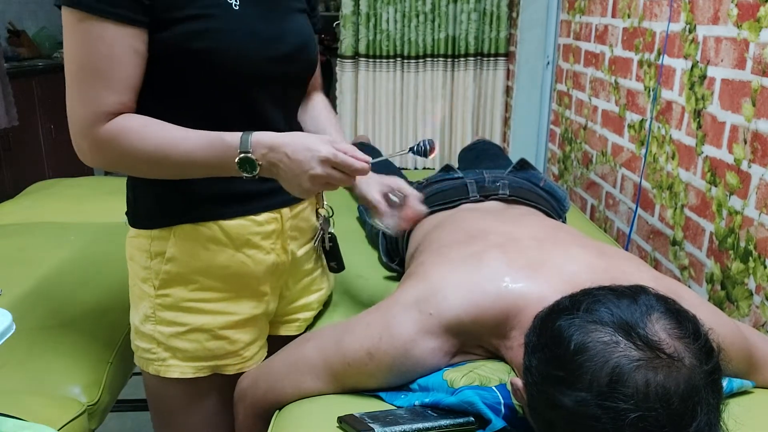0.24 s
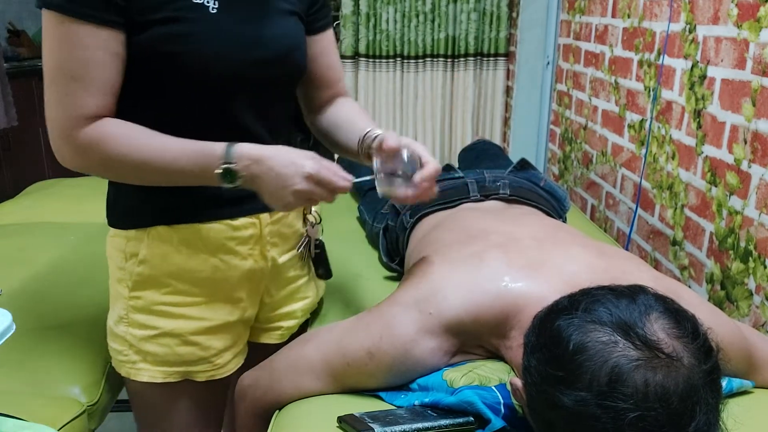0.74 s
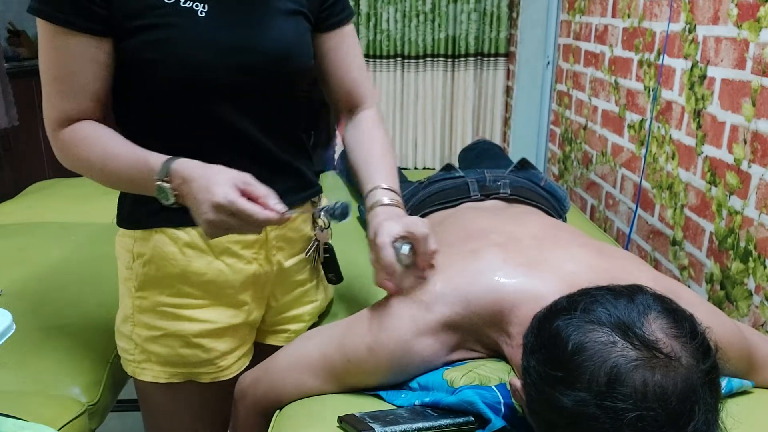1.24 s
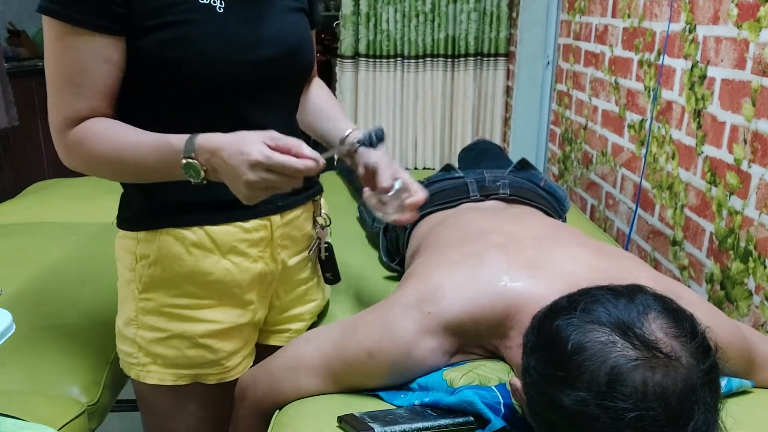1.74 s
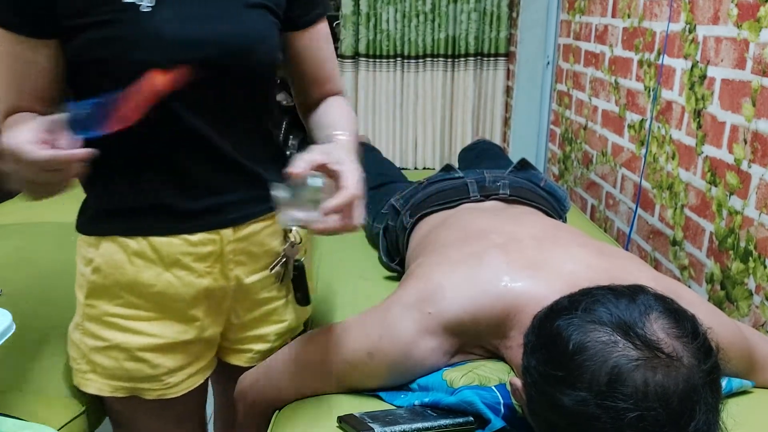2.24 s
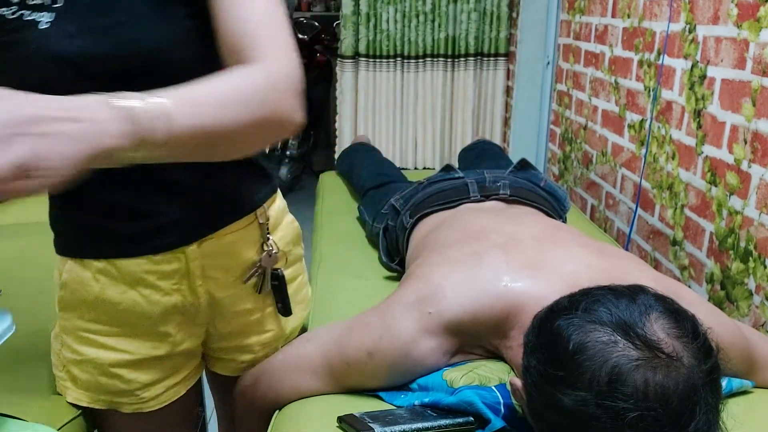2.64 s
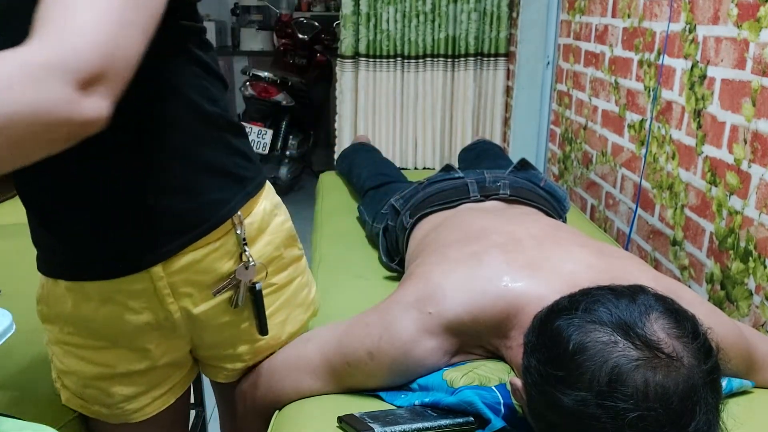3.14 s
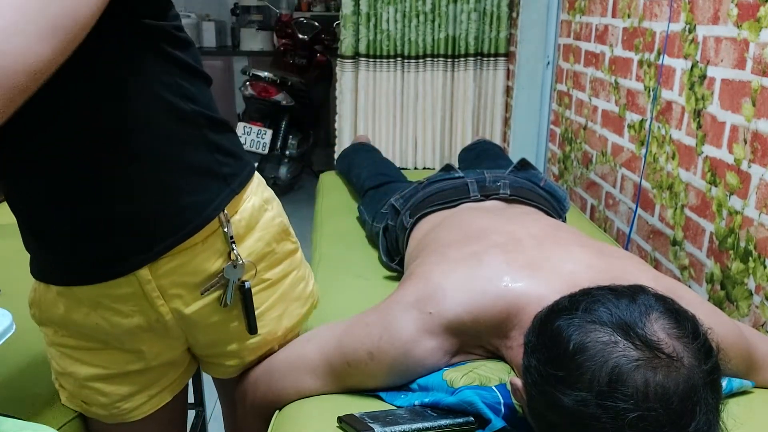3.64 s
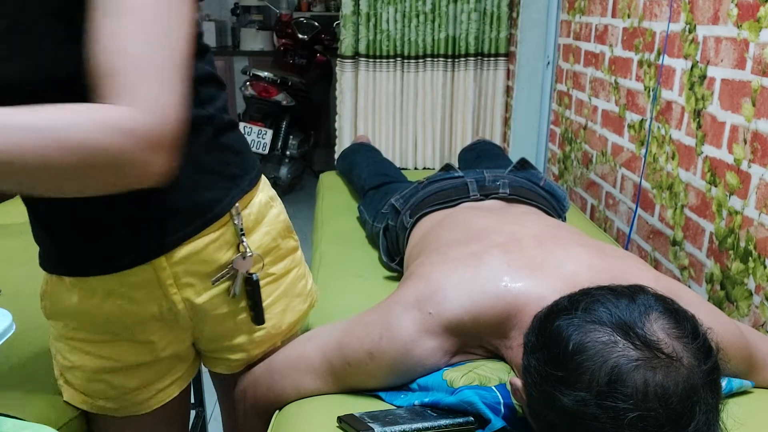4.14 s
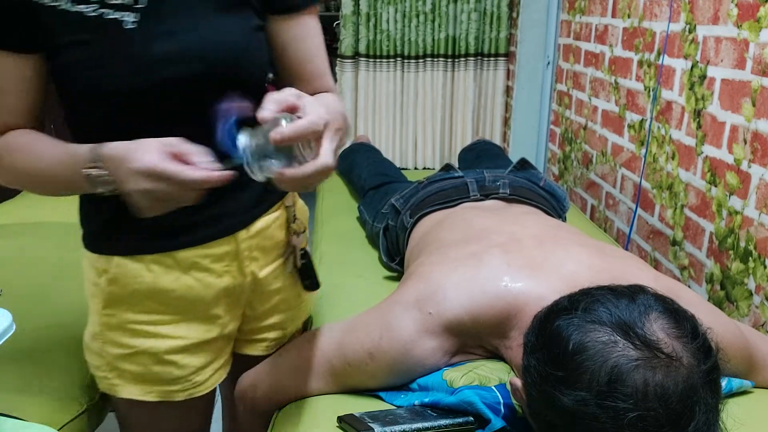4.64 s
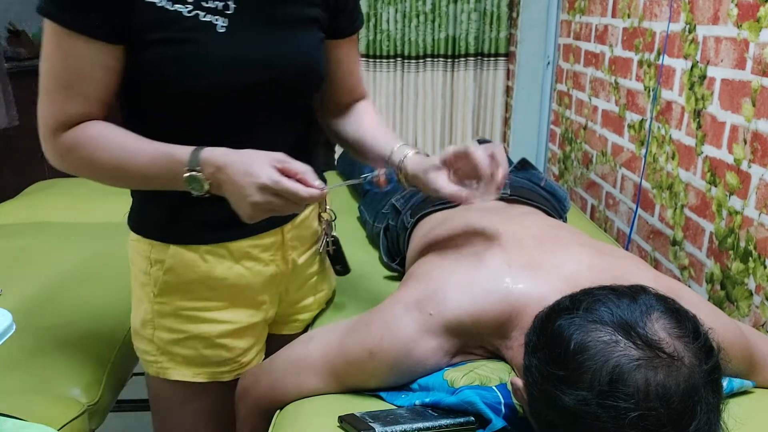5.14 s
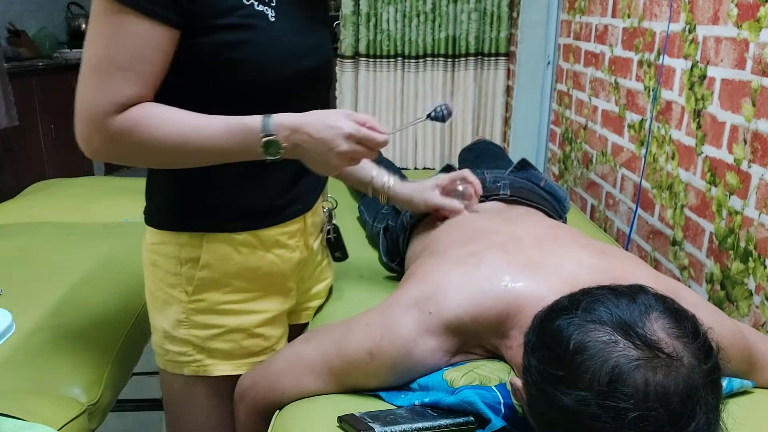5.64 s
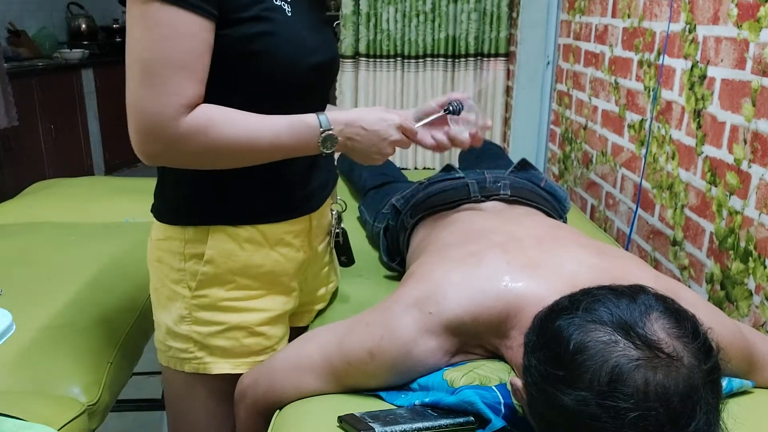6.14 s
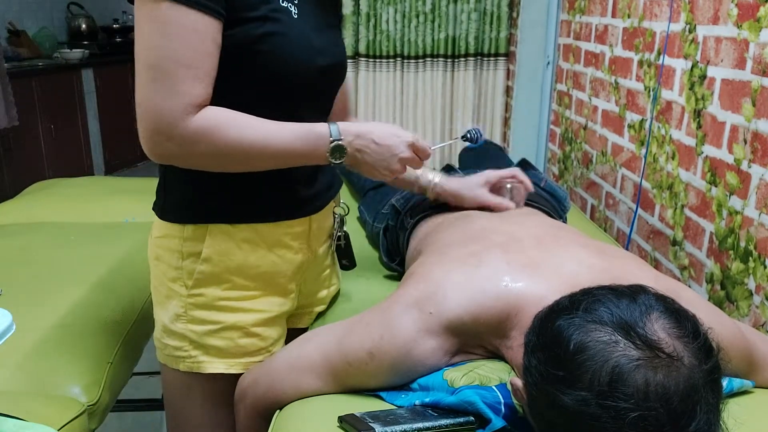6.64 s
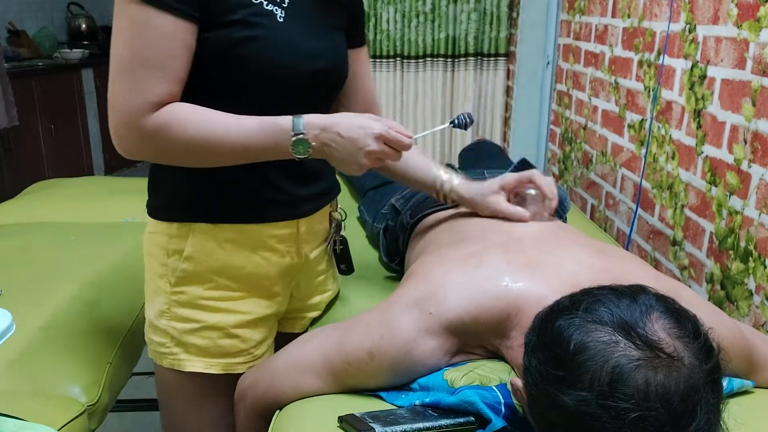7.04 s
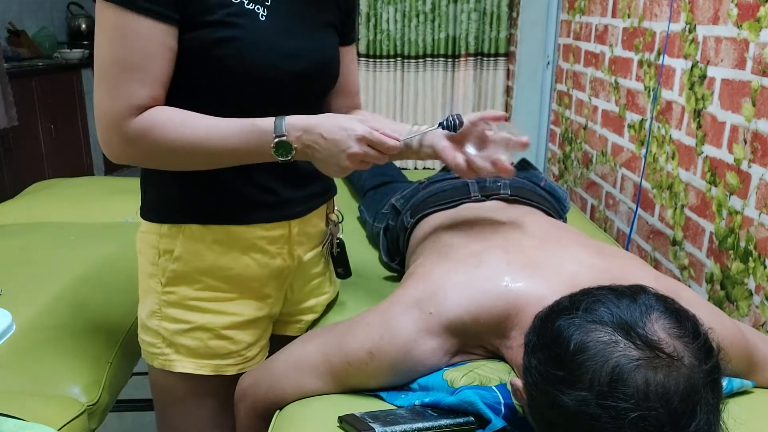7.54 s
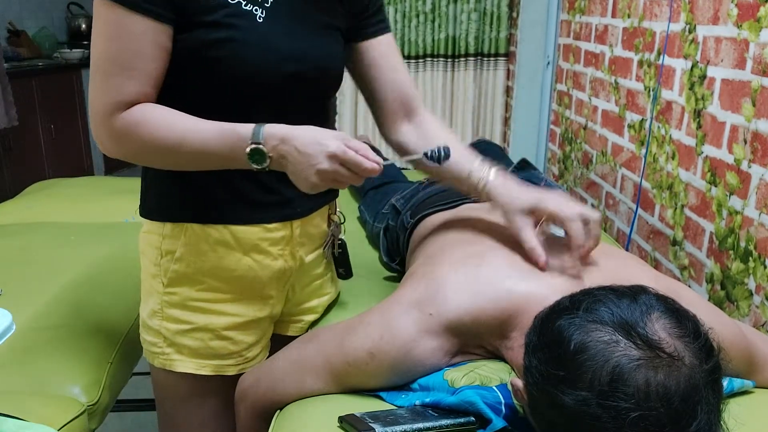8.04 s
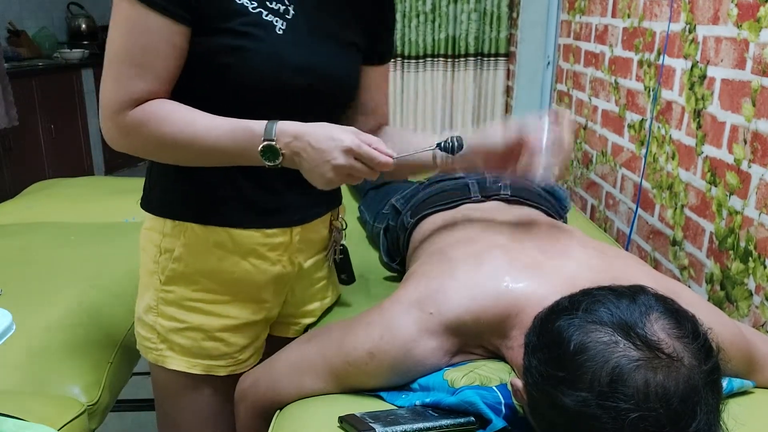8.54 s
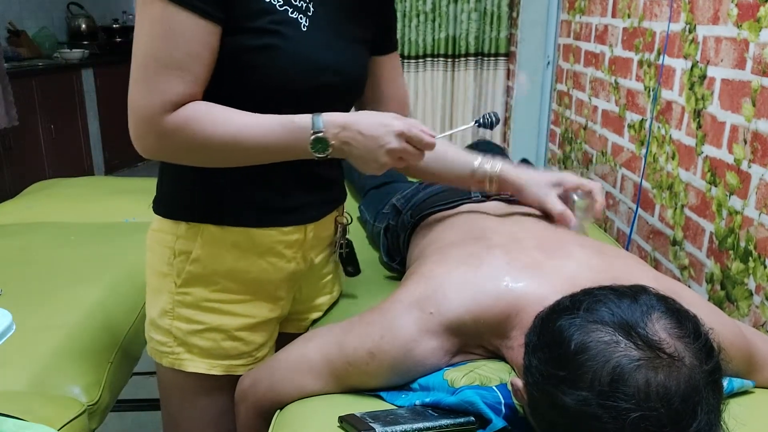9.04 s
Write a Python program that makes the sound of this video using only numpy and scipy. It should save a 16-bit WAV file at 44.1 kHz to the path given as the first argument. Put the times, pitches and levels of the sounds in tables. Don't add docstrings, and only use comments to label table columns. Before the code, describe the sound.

Glass cups smack onto an oiled back and pop off in quick trains, while spare cups clatter in a metal tray, in a small hard room.

```python
import sys
import numpy as np
from scipy import signal
from scipy.fft import rfft, irfft
from scipy.io import wavfile
from scipy.ndimage import uniform_filter1d, map_coordinates

SR = 44100
rng = np.random.default_rng(int(sys.argv[2]) if len(sys.argv) > 2 else 0)


def pcm_store(signal):
    levels = np.round(np.clip(np.atleast_2d(signal), -1, 1) * 32767)
    wavfile.write(sys.argv[1], SR, levels.astype(np.int16).T)


def nominal_scale(level):
    x = np.asarray(level, float) / 20
    return 10 ** x


N = 409248

# pitch in Hz, level in dB per Hz.
CRACK_COLOUR = [(400, -26.5), (900, -6), (1800, -13.5), (3100, -25), (5500, -27.5), (8000, -31.5),
                (12000, -30), (15800, -32), (17000, -52.5)]
# time in seconds, rim peak in dB, tray in dB, cup wall in dB, top notes in dB.
CUP_DROPS = [(2.9329, -19.5, -18.5, -47, -36.5), (2.947, -31, -22, -41.5, -46),
             (2.9839, -17.5, -14, -28.5, -37), (2.994, -21, -21.5, -30, -38),
             (3.0041, -21.5, -18, -19, -50), (3.014, -23, -21.5, -34, -49.5),
             (3.0679, -16, -16, -42.5, -44.5), (3.075, -10.5, -25.5, -38.5, -46),
             (3.085, -25, -23.5, -37.5, -49.5), (3.0944, -22, -21, -36, -44.5),
             (3.106, -25.5, -20, -39, -47), (3.1562, -27.5, -19.5, -35, -50.5),
             (3.165, -25.5, -25, -22, -46.5), (3.1737, -18.5, -21.5, -35.5, -43.5),
             (3.183, -16, -30, -34, -50.5), (3.2897, -50.5, -33.5, -51, -54.5),
             (3.3207, -54, -36, -56, -60), (3.3658, -53, -41.5, -57, -70), (3.3954, -34, -16, -40, -21),
             (3.407, -27.5, -23, -45.5, -34), (3.4193, -21, -25, -39, -33.5),
             (3.431, -21.5, -24, -38, -32.5), (3.445, -23.5, -21, -20, -31.5), (3.455, -18, -16, -17, -36),
             (3.4677, -17, -21, -29, -32), (3.479, -24, -20.5, -35.5, -36),
             (3.492, -33.5, -27.5, -42.5, -38.5), (3.509, -23, -28, -16.5, -32.5),
             (3.516, -22, -22.5, -9, -33.5), (3.5249, -23.5, -19, -6.5, -29.5), (3.532, -16, -28, -16, -33),
             (3.5441, -17, -20.5, -25, -40), (3.554, -28, -25.5, -22.5, -44.5),
             (3.5648, -29.5, -26, -31.5, -44.5), (3.577, -25, -26, -46, -49.5),
             (3.5941, -14, -31, -39, -58), (3.6377, -46, -29, -41, -65), (3.7767, -36.5, -34, -41, -52),
             (3.8473, -42, -43, -49, -51), (3.9433, -66, -50.5, -68, -70)]
# pitch in Hz, level in dB, time to fall 60 dB in seconds.
TRAY_MODES = [(970, -2, 0.029), (1150, -8.5, 0.048), (1400, -2.5, 0.0052), (1546, -3, .012),
              (1829, 1, 0.0082), (2090, -1, 0.011), (2332, -4, .006), (2550, 0, 0.0044), (2930, -4.5, .004),
              (3500, -5, 0.0093), (3620, -10.5, 0.0079)]
BOWL_MODES = [(4080, 2, 0.045), (4530, -14, 0.03)]
TOP_MODES = [(10600, -16, .02), (12376, -2, .1), (12746, 1, .1), (13170, -2, .09), (13500, -12, .07),
             (13810, -13, .06), (14050, -10, .06)]
FLOOR_MODES = [(570, -2.5, .045), (684, -15.5, 0.026), (769, -7, 0.082), (885, -10, 0.0094)]


def on_log(table, hz):
    f, v = np.transpose(table)
    return np.interp(np.log(np.maximum(hz, 1)), np.log(f), v)


def unit(x):
    return x / np.sqrt(np.mean(x ** 2))


def coloured(table, count):
    hz = np.fft.rfftfreq(count, 1 / SR)
    white = rfft(rng.standard_normal(count))
    return unit(irfft(white * nominal_scale(on_log(table, hz)), count))


def ring(x, modes):
    out = 0
    for hz, db, t60 in modes:
        r = np.exp(-np.log(1000) / (t60 * SR))
        w = 2 * np.pi * hz / SR
        out = out + signal.lfilter([0, nominal_scale(db) * r * np.sin(w)], [1, -2 * r * np.cos(w), r * r], x)
    return out


def add(bus, s, sound, pan_db, lag):
    for side, sign in enumerate((1, -1)):
        i = int(s * SR) + max(int(sign * lag), 0)
        part = np.broadcast_to(sound, (2, np.shape(sound)[-1]))[side, :N - i]
        bus[side, i:i + len(part)] += part * nominal_scale(sign * pan_db / 2)


def walk(rate, count):
    steps = np.arange(count) * rate / SR
    return map_coordinates(rng.standard_normal(int(steps[-1]) + 2), [steps], order=1) * 1.48


def slaps():
    # time in seconds, thump in dB, trapped-air pitch in Hz, trapped air in dB, bed in dB.
    hits = [(1.032, -33.5, 510, -22, -45), (5.024, -17.5, 830, -6, -61), (5.248, -18.5, 750, -10.5, -21.5),
            (5.46, -20.5, 566, -13, -26), (5.664, -20.5, 410, -9, -55), (5.877, -17.5, 480, -6, -53),
            (6.6691, -18.5, 502, -2.5, -19), (6.896, -18.5, 396, -7.5, -64), (7.104, -17, 790, -1.5, -17),
            (7.318, -18, 860, -7.5, -15.5), (8.052, -19.5, 509, -6.5, -27), (8.863, -24.5, 716, -17, -32),
            (9.094, -23, 733, -17, -25)]
    # seal closes in seconds after first contact, far side lands in seconds later, its share of the blow.
    landings = [(.0021, 0.0065, 0.19), (0.0012, .0025, 0.53), (.0016, .0014, 1.2), (0.0019, 0.0053, .3),
                (0.0013, .0056, 0.41), (.0018, .0057, 0.3), (.0004, .005, 0.24), (0.0011, 0.0056, 0.28),
                (0.0014, 0.00141, 0.34), (0.0023, 0.00121, 0.66), (.0021, 0.00173, 0.34),
                (.0016, 0.00138, 0.51), (0.0011, 0.00133, 1.12)]
    # pitch in Hz, level in dB, time to fall 60 dB in seconds.
    flesh = [(155, -23, 0.13), (185.5, 0, 0.047), (234, 6, 0.018), (296, 3, 0.04), (493, -9.5, 0.02)]
    bed = [(63.8, -5, 0.32), (91, -30, .2)]
    chamber = (1245, -10, 0.013)
    crack_db, crack_growth, firm_db = -11.5, 1.76, -20.5
    squeeze_s, squeeze = .0008, 0.51
    bus, t = np.zeros((2, N)), np.arange(int(.4 * SR)) / SR
    soft = np.hanning(int(0.00045 * SR))
    for (s, thump_db, air_hz, air_db, bed_db), (seal_s, far_s, share) in zip(hits, landings):
        touch = np.zeros(len(t))
        touch[[0, int(far_s * SR)]] = 1, share
        push = np.roll(touch, int(squeeze_s * SR)) - squeeze * touch
        push = np.convolve(push, soft / soft.sum())[:len(t)]
        seal = push * (t < squeeze_s + .0005)
        air = ring(push, [(air_hz, 0, .006)]) + ring(seal, [(3.0 * air_hz, -13, .003), chamber])
        body = nominal_scale(thump_db) * ring(push, flesh) + nominal_scale(bed_db) * ring(push, bed)
        spit = nominal_scale(6.5) * tear(len(t)) + nominal_scale(-12) * np.exp(-t / 0.0044) * coloured(CRACK_COLOUR, len(t))
        crack = nominal_scale(crack_db + crack_growth * (thump_db - firm_db)) * spit
        add(bus, s + seal_s - squeeze_s - .0006, nominal_scale(air_db) * air + body + crack, 0, 1)
    return bus


def tear(count):
    spread_s = 0.0006054
    hz = np.fft.rfftfreq(count, 1 / SR)
    late = spread_s * (1 + np.interp(hz, np.linspace(0, SR / 2, num=40), rng.exponential(size=40)))
    phase = 2 * np.pi * np.cumsum(late) * hz[1]
    snap = irfft(nominal_scale(on_log(CRACK_COLOUR, hz)) * np.exp(-1j * phase), count)
    return snap / np.sqrt(np.sum(snap ** 2))


def pops():
    # time in seconds, peak in dB, start pitch in Hz, length in seconds, skin in dB.
    pulls = [
        (0.22, -22, 266, 0.027, -10.5),
        (1.4957, -9.5, 490, 0.025, -2),
        (5.105, -10.5, 380, 0.014, -12),
        (5.306, -22.5, 380, 0.015, -26),
        (5.52, -24, 354, 0.019, -20),
        (5.936, -27, 223, 0.025, -15),
        (7.393, -18, 332, 0.021, -12),
        (8.554, -2.9, 336, 0.015, -7.5),
        (8.912, -32.5, 393, 0.02, -41),
        (9.149, -23.5, 344, 0.021, -19),
    ]
    # pitch in Hz, level in dB, time to fall 60 dB in seconds.
    skin = [(71.8, -33, 0.65), (185, -27.5, 0.022), (430, 5, 0.011)]
    open_hz = 1038
    bus, t = np.zeros((2, N)), np.arange(int(.2 * SR)) / SR
    tug = np.exp(-((t - .0015) / 0.00036) ** 2)
    suck = ring(tug / tug.sum(), skin)
    for s, db, start_hz, length, skin_db in pulls:
        lift = t / length
        hz = open_hz - (open_hz - start_hz) * np.exp(-lift / 0.826 - 1.36 * lift ** 2)
        swell = (1 - np.exp(-(lift / 0.44) ** 2)) * np.exp(-1.9 * lift) / (1 + lift ** 10)
        note = swell * np.sin(2 * np.pi * np.cumsum(hz) / SR)
        add(bus, s, -nominal_scale(db + 13.5) * note - nominal_scale(skin_db) * suck, 0, 0)
    return bus


def leaks():
    # start in seconds, swell in seconds, hiss in dB, whistle pitch in Hz, whistle in dB.
    jets = [
        (0.205, 0.012, -48.5, 1400, -44.5),
        (1.022, 0.0033, -49.5, 870, -41),
        (1.482, 0.014, -31, 1369, -30),
        (5.089, 0.012, -47.5, 1300, -48),
        (5.88, 0.00515, -58, 3090, -32),
        (6.726, 0.006, -45, 4400, -57),
        (8.529, 0.014, -24.5, 1296, -20),
        (8.908, 0.0067, -56.5, 3000, -70),
    ]
    # pitch in Hz, level in dB per Hz.
    hiss_colour = [(1180, -52), (2000, 5.5), (3170, 1), (5780, 0.5), (6880, -1.5), (7380, 1), (11300, 2),
                   (14000, 3.5), (16000, -9)]
    # pitch in Hz, level in dB, time to fall 60 dB in seconds.
    column = [(4400, 1, 0.0081), (9330, 1, 0.012), (11100, 7.5, 0.0047), (13400, 4, 0.0095)]
    tilts = [(7000, -2, .008), (7000, 3, .008), (6850, -4, 0.014), (7550, 6, 0.013), (7050, -15, .008),
             (7000, -15, .008), (7500, -17, .008), (14000, 9, .003)]
    column_db, column_growth, strong_db = -23, 1, -21.5
    whistle_fall, hiss_later = 1, 1.49
    bus, t = np.zeros((2, N)), np.arange(int(.2 * SR)) / SR

    def gap(peak_s, die_s):
        return np.minimum(t / peak_s, np.exp(-(t - peak_s) / die_s)) ** 0.95

    for (start, swell_s, hiss_db, whistle_hz, whistle_db), tilt in zip(jets, tilts):
        fall = whistle_fall * np.exp(-t / (0.2855 * swell_s))
        pitch = whistle_hz * (1 + fall + 0.1 * walk(512, count=len(t)))
        level = nominal_scale(whistle_db + 4.0 + 2.9 * walk(363.6, count=len(t)))
        whistle = level * np.sin(2 * np.pi * np.cumsum(pitch) / SR)
        rush = rng.standard_normal(len(t))
        breathy = ring(rush, [(whistle_hz, 0, 5 / whistle_hz), (0.55 * whistle_hz, -3, 6 / whistle_hz)])
        whistle = whistle + nominal_scale(whistle_db - 0.5) * unit(breathy)
        blown_db = column_db + column_growth * (hiss_db - strong_db)
        air = nominal_scale(blown_db) * unit(ring(rush, column + [tilt])) + nominal_scale(hiss_db) * coloured(hiss_colour, len(t))
        add(bus, start, gap(swell_s, 0.018) ** 1.97 * whistle + gap(hiss_later * swell_s, 0.0087) * air, 0, 0)
    return bus


def strikes(table, bodies, tick_db, rattle_s, rattle_db, pan_db, lag):
    soft_above_hz = 13500
    t, bus = np.arange(int(.25 * SR)) / SR, np.zeros((2, N))
    dull = signal.butter(8, soft_above_hz, fs=SR, output="sos")
    for row in table:
        blow = rng.standard_normal(len(t)) * (rng.random(len(t)) < .08)
        blow *= nominal_scale(rattle_db) * np.exp(-(t / rattle_s) ** 2.0)
        blow[0] = 1
        push = signal.sosfilt(dull, blow)
        sound = nominal_scale(tick_db + row[-1]) * signal.sosfilt(dull, np.diff(blow, prepend=0))
        for db, modes in zip(row[1:], bodies):
            for hz, mode_db, t60 in modes:
                spot_db, left_db, right_db, detune = rng.standard_normal(4) * (1.8, 2, 2, 1)
                facing = nominal_scale(np.array([[left_db], [right_db]]))
                mode = (hz + 0.51 * detune / t60, db + mode_db + spot_db, t60)
                sound = sound + facing * ring(blow if hz > soft_above_hz else push, [mode])
        fade = np.cos(np.pi / 2 * t / t[-1])
        add(bus, row[0], sound * fade, pan_db, lag + rng.uniform(-3, 2))
    return bus


def clear_notes(table, pan_db, lag):
    bus, touch = np.zeros((2, N)), np.zeros(int(.3 * SR))
    touch[0] = 1
    for s, hz, db, t60 in table:
        add(bus, s, ring(touch, [(hz, db, t60)]), pan_db, lag)
    return bus


def rod_ticks():
    # time in seconds, rim peak in dB, air in dB, bowl in dB, top in dB.
    ticks = [(0.676, -50, -47.5, -65, -36.5), (0.7469, -41, -38.5, -20.5, -34.5),
             (0.824, -38, -50.5, -69, -57), (4.731, -74, -37, -64, -80.5), (4.798, -57, -68, -55, -79),
             (4.822, -45.5, -69, -81, -75), (4.8338, -50, -55, -67, -66), (6.325, -41, -61, -73, -74),
             (6.452, -49, -52, -74, -73), (6.469, -76, -72, -87.5, -50), (6.549, -72, -54, -73, -70),
             (7.7211, -32.5, -63, -88, -56), (7.7314, -38, -60, -66, -61), (7.7568, -42, -45, -70, -32),
             (7.7818, -53, -51, -62, -58), (7.873, -50, -56, -69, -61), (7.9015, -33, -46.5, -79, -50)]
    # pitch in Hz, level in dB, time to fall 60 dB in seconds.
    cup_rim = [(7660, -5.5, 0.033), (7800, -7, 0.011)]
    cup_air = [(1185, 4, 0.012), (1044, -27, 0.012), (1400, -0.5, 0.016), (1720, -11, 0.0025),
               (2300, 0.5, 0.0029)]
    cup_bowl = [(3420, -6, 0.0056), (3700, -16, .004)]
    cup_top = [(12300, -2, .025), (12820, -8, .02), (13400, -9, .012)]
    cup_lip = [(8700, -17, .006), (9400, -5, 0.0059), (10800, -5, .004), (14600, -8, 0.0039)]
    # time in seconds, pitch in Hz, level in dB, time to fall 60 dB in seconds.
    hand_notes = [(0.7474, 3526, -21.5, 0.024), (0.7474, 1260, -29, 0.035), (0.752, 3420, -25, .012),
                  (0.7474, 13100, -34, .02), (4.731, 3500, -42, .008), (1.498, 4270, -33, 0.016),
                  (1.499, 6850, -25, 0.016), (0.824, 7540, -47, .06), (7.7198, 7850, -31, 0.017),
                  (7.7323, 7650, -27, .015), (7.7577, 7800, -23, 0.017), (7.7577, 8770, -18.5, 0.011),
                  (7.7577, 11700, -35, .006), (7.7577, 14700, -24, 0.0023), (7.762, 13500, -19, .008),
                  (7.7815, 1250, -27, 0.015), (7.7865, 1240, -23, 0.018), (7.8734, 7550, -35, 0.024),
                  (7.9014, 7750, -25, 0.035), (7.9014, 10800, -28, .003)]
    lip_db = 6
    taps = [(s, rim, air, bowl, top, (rim + top) / 2 + lip_db) for s, rim, air, bowl, top in ticks]
    bodies = [cup_rim, cup_air, cup_bowl, cup_top, cup_lip]
    return strikes(taps, bodies, 2.6, 0.0057, -0.5, 0.29, -1) + clear_notes(hand_notes, .3, -1.1)


def tray_clatter():
    # pitch in Hz, level in dB, time to fall 60 dB in seconds.
    rim_modes = [(7770, -28.5, 0.22), (7560, -5, 0.042), (7650, -4, 0.03), (8060, -10, 0.025),
                 (8600, -21, 0.036)]
    wall_modes = [(5500, -4, 0.053), (5840, -13.5, .02), (6200, -14, 0.017), (6260, -27.5, .02)]
    # time in seconds, pitch in Hz, level in dB, time to fall 60 dB in seconds.
    tray_notes = [(2.934, 547, -14.5, .1), (2.934, 8150, -24.5, .03), (2.985, 588, -15, .1),
                  (2.986, 7300, -21, .06), (2.986, 12500, -19.5, .12), (3.003, 8200, -18, .05),
                  (3.004, 5450, -27.5, .035), (3.0685, 7660, -12, .12), (3.0685, 8300, -16.5, .05),
                  (3.095, 600, -16, .08), (3.1565, 7660, -11.5, .09), (3.175, 602, -15.5, .06),
                  (3.1775, 5650, -30, .04), (3.172, 7640, -17, .06), (2.934, 13500, -30, .1),
                  (3.5105, 13170, -21, .15), (3.079, 14000, -36, .1), (3.397, 15698, -24, .15),
                  (3.447, 15698, -30.5, .1), (3.512, 15698, -32, .12), (2.9845, 2050, -14.5, .012),
                  (3.0685, 1900, -13, .012), (3.397, 7400, -23.5, .12), (3.397, 12400, -22, .1),
                  (3.4312, 5480, -29.5, .1), (3.4452, 5470, -20, .15), (3.47, 4100, -18.5, .05),
                  (3.5095, 5500, -12, .15), (3.5165, 5440, -13.5, .12), (3.531, 6100, -12.5, .025),
                  (3.547, 5500, -17, .08), (3.564, 7480, -20.5, .1), (3.566, 5500, -18.5, .12),
                  (3.571, 4040, -23, .08), (4.156, 5480, -54, 0.36), (4.166, 782, -33, .08),
                  (4.172, 6896, -42, .05), (4.188, 832, -31, .1), (4.208, 6444, -39.5, .25)]
    bowl_db = -14.5
    cups = [(s, rim, tray, rim + bowl_db, wall, top) for s, rim, tray, wall, top in CUP_DROPS]
    bodies = [rim_modes, TRAY_MODES, BOWL_MODES, wall_modes, TOP_MODES]
    clatter = strikes(cups, bodies, -1.5, 0.01, -8.5, 2, -19)
    softer_band = signal.butter(1, (8800, 11400), "bandstop", fs=SR, output="sos")
    softer_top = signal.butter(6, 14600, fs=SR, output="sos")
    return signal.sosfilt(np.vstack([softer_band, softer_top]), clatter) + clear_notes(tray_notes, 2.5, -18.5)


def tray_knocks():
    # time in seconds, floor (first handful) or edge (second) in dB, thin lip in dB.
    knocks = [(2.934, -17, -75.5), (2.9845, -16, -68.5), (3.01, -26, -73.5), (3.04, -21, -73.5),
              (3.07, -32.5, -74.5), (3.095, -24.5, -78.5), (3.113, -19, -77.5), (3.158, -32.5, -72.5),
              (3.174, -17, -78), (3.205, -24, -77.5), (3.396, -28, -31), (3.42, -40.5, -43.5),
              (3.446, -30, -39.5), (3.47, -38, -43.5), (3.49, -24.5, -47), (3.511, -21, -38),
              (3.526, -21.5, -38.5), (3.545, -14, -46), (3.565, -30.5, -62.5), (3.6, -42, -73.5),
              (3.64, -28, -75)]
    # pitch in Hz, level in dB, time to fall 60 dB in seconds.
    edge_modes = [(600, -13, 0.018), (700, -4.5, .03), (790, 4.5, .035), (906, -2.5, 0.018)]
    thin_lip = [(15698, 0, .07)]
    second_handful_s = 3.3
    first = [row for row in knocks if row[0] <= second_handful_s]
    second = [row for row in knocks if row[0] > second_handful_s]
    on_floor = strikes(first, [FLOOR_MODES, thin_lip], -30.5, 0.0091, -8.0, 2, -22.0)
    return on_floor + strikes(second, [edge_modes, thin_lip], -30.5, 0.0091, -8.0, 2, -22.0)


def set_down():
    # time in seconds, wall peak in dB, tray in dB, bowl in dB, top in dB.
    touches = [
        (4.155, -46, -44, -53, -62),
        (4.19, -53, -53, -80, -68),
        (4.2115, -51, -72, -72, -80),
    ]
    # pitch in Hz, level in dB, time to fall 60 dB in seconds.
    spare_wall = [(5450, -7, .03), (6444, -3, .03), (6900, -15, .03)]
    bodies = [spare_wall, TRAY_MODES + FLOOR_MODES, BOWL_MODES, TOP_MODES]
    return strikes(touches, bodies, 4.3, 0.026, -8, 0.55, -18.0)


def table_thuds():
    # pitch in Hz, level in dB, time to fall 60 dB in seconds.
    table_modes = [(211.6, -25.5, 0.0087), (312, -32, 0.085)]
    drops = [(s, tray, top) for s, rim, tray, wall, top in CUP_DROPS]
    return strikes(drops, [table_modes], -56.5, 0.04, -5.5, 1.2, -21.0)


def squeals():
    # start in seconds, length in seconds, loudest level in dB, octave in dB.
    brakes = [
        (0, 0.087, -47, -35),
        (0.219, 0.23, -51, -9),
        (0.573, 0.14, -63.5, 2),
        (5.679, 0.35, -54.5, -1),
        (5.9, 0.275, -51.5, -28),
        (6.045, 0.32, -45.5, -38),
        (6.521, 0.67, -45.5, -40),
    ]
    # start pitch in Hz, end pitch in Hz.
    glides = [(4000, 4010), (6000, 5995), (5985, 5985), (5810, 6030), (7710, 7880), (11760, 11820),
              (11800, 11760)]
    grip_s, sag_db, let_go_s = 0.083, -12.5, 0.063
    bus = np.zeros((2, N))
    for (s, length, db, octave_db), (start_hz, end_hz) in zip(brakes, glides):
        t = np.arange(0, length, 1 / SR)
        fade = np.clip(np.minimum(t / grip_s, (length - t) / let_go_s), 0, 1)
        level = fade * nominal_scale(db + sag_db * t / length + 3.8 * walk(70.9, count=len(t)))
        pitch = start_hz + (end_hz - start_hz) * t / length + 12 * walk(90, count=len(t))
        phase = 2 * np.pi * np.cumsum(pitch) / SR
        add(bus, s, level * (np.sin(phase) + nominal_scale(octave_db) * np.sin(2 * phase)), 0, 0)
    return bus


def street():
    # time in seconds, traffic in dB, extra bass in dB.
    traffic = [(0, -49, 6.5), (.6, -47.5, 2.5), (1.4, -50.5, 1.5), (2.1, -49.5, -1.7), (4, -50.5, -3),
               (4.6, -56, 1.5), (5.202, -47.5, -5), (6.3, -46, -3.5), (7.6, -49.5, 0.5),
               (8.399, -50.5, -0.5), (9.28, -51.5, 3)]
    # pitch in Hz, level in dB per Hz.
    air_colour = [(15, -39), (25, -21), (59, -0.5), (120, -1.5), (195, -13.5), (293, -9), (326, -13),
                  (384, -13), (503, -17), (714, -15.5), (1330, -23), (2000, -27), (7510, -42),
                  (13200, -42.5), (16000, -52)]
    hiss_db, hiss_follow, usual_db = -49.5, 0.66, -46.5
    s, traffic_db, bass_db = np.transpose(traffic)
    t, hz = np.arange(N) / SR, np.fft.rfftfreq(N, 1 / SR)
    rumble, bass = np.interp(t, s, traffic_db), np.interp(t, s, bass_db)
    hiss = hiss_db + hiss_follow * (rumble - usual_db)
    noise = rfft(rng.standard_normal((2, N))) * nominal_scale(on_log(air_colour, hz))
    noise /= np.sqrt(np.mean(irfft(noise[0], N) ** 2))
    out = 0
    for centre in 30 * 2 ** np.arange(0, 9.6, .7):
        band = np.clip(1 - np.abs(np.log2(hz / centre + 1e-9)) / 0.82, 0, 1) ** .5
        mid, side = irfft(noise * band, N)
        bright = np.clip(np.log2(centre / 700) / 1.0, 0, 1)
        flicker = (2.2 - 1.6 * bright) * walk(5, count=N)
        db = rumble + bright * (hiss - rumble) + flicker + np.clip(np.log2(320 / centre), 0, 1) * bass
        width = np.clip(centre / 900, .12, .9)
        out = out + nominal_scale(db) * (mid + width * side * np.array([[1], [-1]]))
    return out


def fan():
    # pitch in Hz, width in Hz, level in dB.
    hums = [(68.3, 12, -68), (292.2, 7, -58), (682, 37, -61), (750, 20, -72), (884, 13, -72.5)]
    hum = 0
    for hz, width, db in hums:
        hum = hum + nominal_scale(db) * unit(ring(rng.standard_normal(N), [(hz, 0, 1.6 / width)]))
    level = nominal_scale(-56 + 2.8 * walk(12, count=N))
    pitch = 712 + 3 * walk(6.5, count=N)
    return hum + level * np.sin(2 * np.pi * np.cumsum(pitch) / SR)


def room(x):
    # pitch in Hz, time to fall 60 dB in seconds.
    fall_times = [(60, 0.61), (160, 0.46), (420, 0.46), (1100, 0.52), (3000, 0.41), (8000, 0.24),
                  (16000, 0.75)]
    # pitch in Hz, echo level in dB.
    echo_levels = [(60, -7), (250, 0), (1000, -3.5), (4000, 1.5), (14000, -6)]
    t = np.arange(int(.9 * SR)) / SR
    dense = rng.random((2, len(t))) < np.clip(t / .08, .004, 1) ** 1.5 + .004
    echoes = rng.standard_normal((3, len(t))) * (t > .007)
    echoes[:2] *= dense / np.sqrt(uniform_filter1d(dense * 1., 900) + 0.001)
    hz, tail = np.fft.rfftfreq(len(t), 1 / SR), 0
    for centre in 45 * 2. ** np.arange(9):
        octave = np.clip(1 - np.abs(np.log2(hz / centre + 1e-9)), 0, 1)
        band = irfft(rfft(echoes) * octave, len(t))
        alike = np.clip(250 / centre, 0, .975)
        band = alike * band[2] + np.sqrt(1 - alike ** 2) * band[:2]
        fall = nominal_scale(-60 * t / on_log(fall_times, centre))
        tail = tail + nominal_scale(on_log(echo_levels, centre)) * band * fall / np.sqrt(np.sum(fall ** 2))
    return signal.fftconvolve(x, tail * (t > .004), axes=1)[:, :N]


def scene():
    no_bass = signal.butter(6, 480, "high", fs=SR, output="sos")
    tray = signal.sosfilt(no_bass, tray_clatter() + tray_knocks() + set_down())
    rod = signal.sosfilt(no_bass, rod_ticks())
    near = slaps() + pops() + leaks() + rod
    far = nominal_scale(2.0) * squeals()
    echoes = room(near + far + nominal_scale(-4.5) * tray)
    return near + far + tray + echoes + street() + fan() + table_thuds()


def top_cut(x):
    return signal.sosfilt(signal.butter(12, 16970, fs=SR, output="sos"), x)


def record(dry):
    ceiling = 1.42
    cut = signal.sosfilt(signal.butter(6, 48, "high", fs=SR, output="sos"), dry)
    held = cut / (1 + np.abs(cut / ceiling) ** 6) ** (1 / 6)
    dimmed = signal.sosfilt(signal.ellip(6, .2, 22, 15950, fs=SR, output="sos"), held)
    return top_cut(0.69 * dimmed)


dry = scene()
out = record(dry)
pcm_store(out)
```